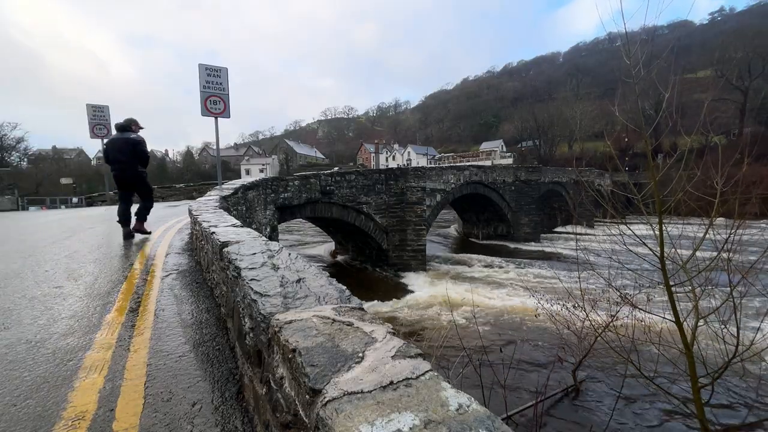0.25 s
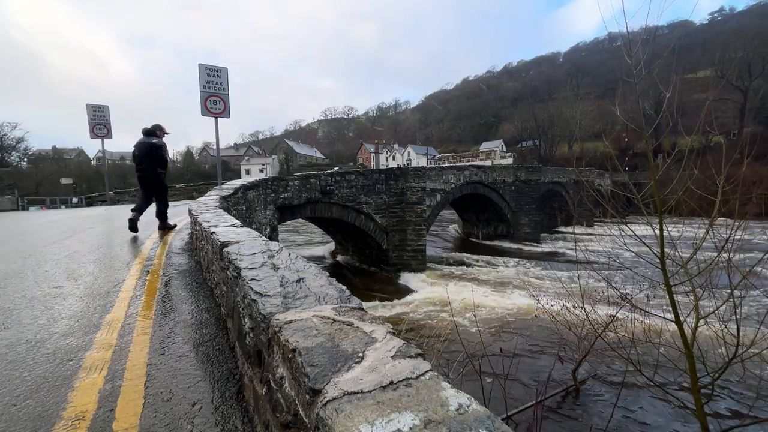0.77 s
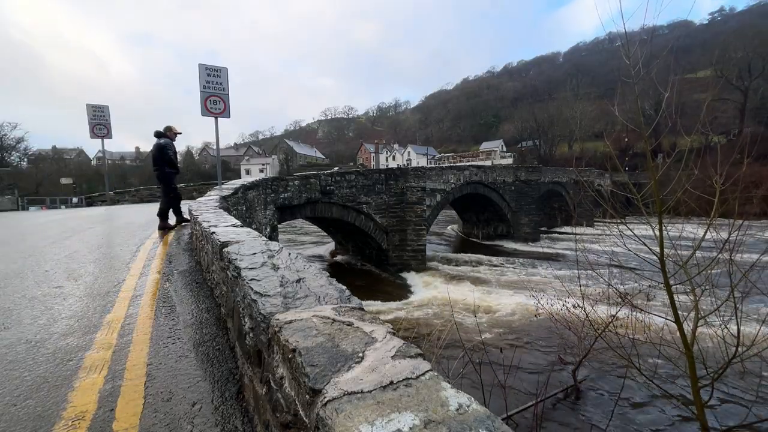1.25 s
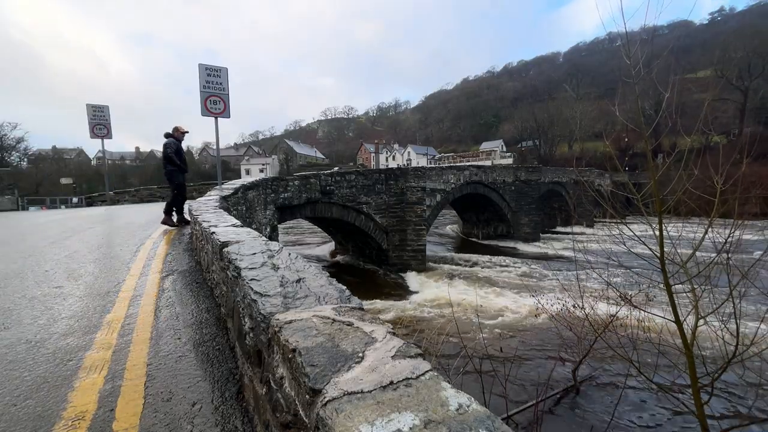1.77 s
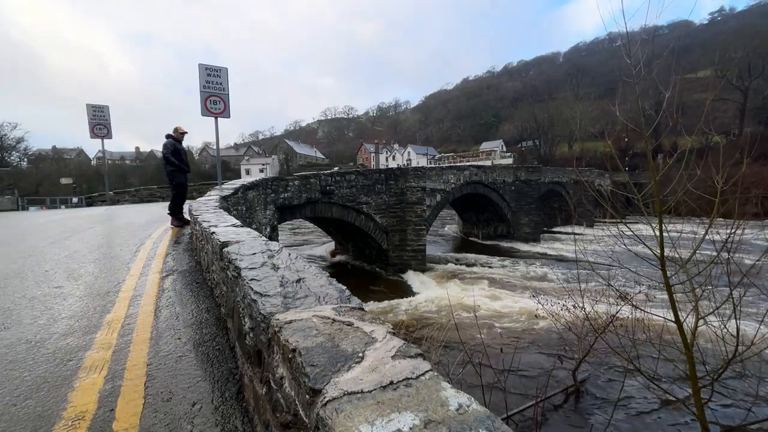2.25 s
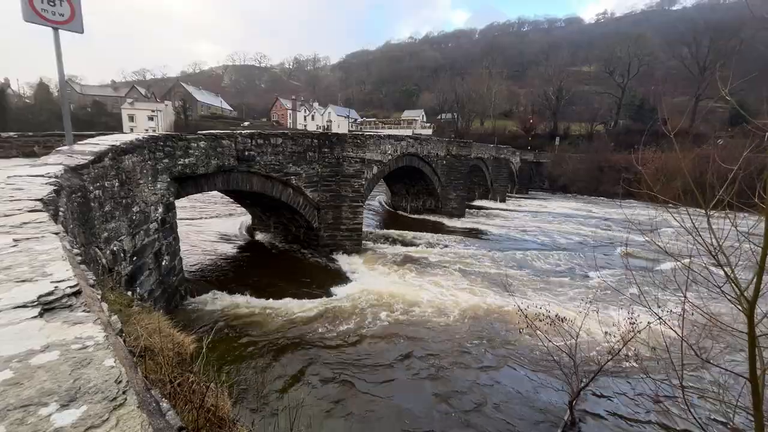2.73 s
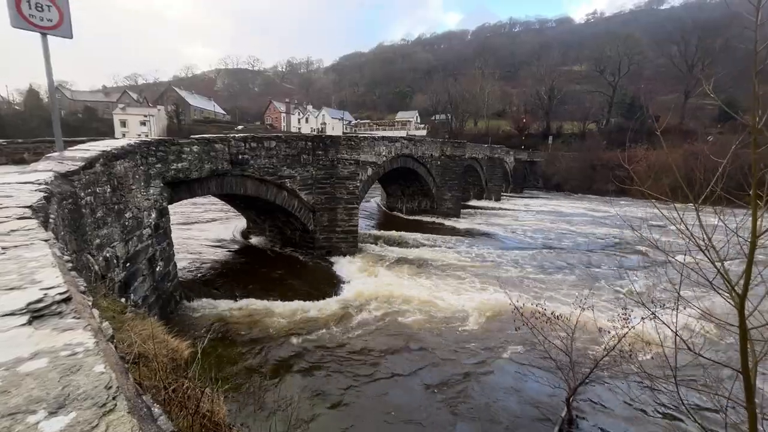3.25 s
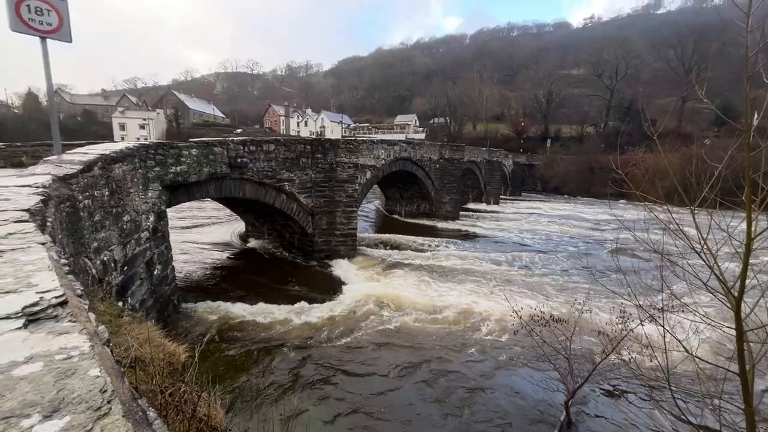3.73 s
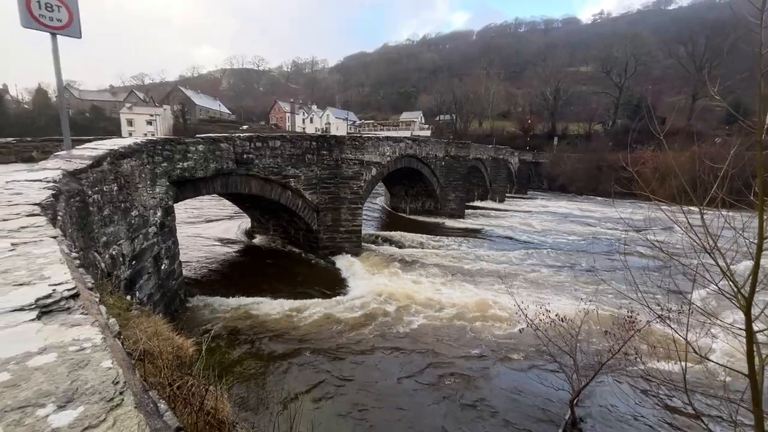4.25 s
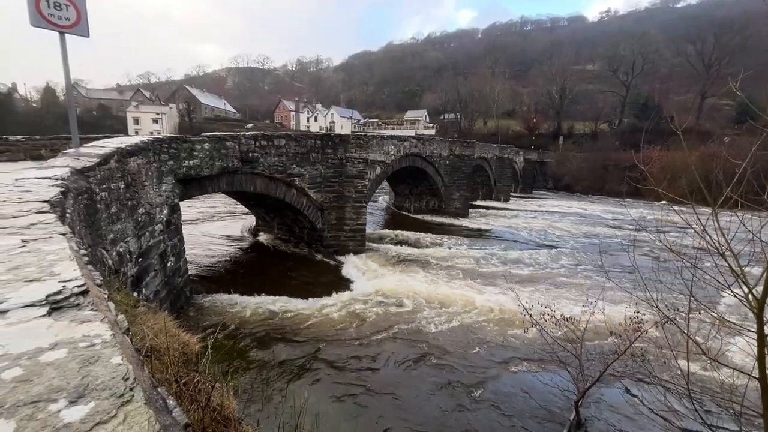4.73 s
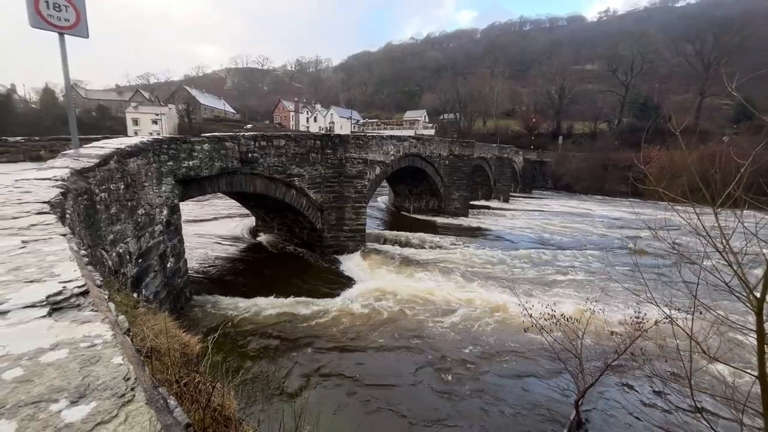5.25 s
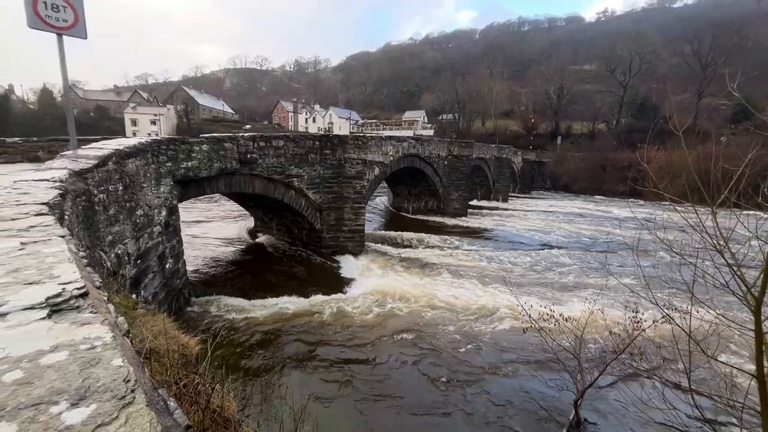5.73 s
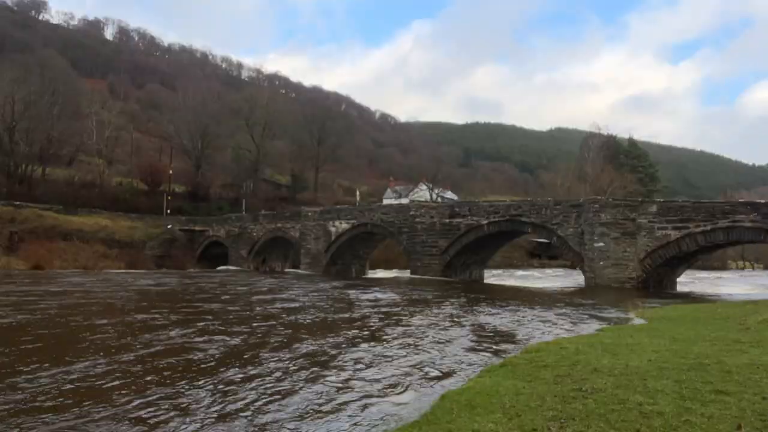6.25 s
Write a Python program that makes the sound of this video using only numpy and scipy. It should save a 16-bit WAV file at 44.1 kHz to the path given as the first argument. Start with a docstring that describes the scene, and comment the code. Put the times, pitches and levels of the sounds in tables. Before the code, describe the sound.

Outdoors, steady broadband white water pours through bridge arches throughout. Faint wind rumble opens the scene; after about two seconds the river's tone changes and wind hits the bare microphone hard, with deep flapping thuds and short clipped dropouts. The roar dips slightly under gusts and recovers. At the end a sudden change brings a sheltered, mellower river with less hiss.

```python
"""River in flood under a stone bridge

A flooded river pours through the arches, heard from the road, then the parapet, then the bank.
The white water is a dense roar of noise for the bubble clouds, its treble heard as a hiss of spray,
with single ringing bubbles on top; each place has its own tone. Wind is low-pitched noise that rumbles
on the microphone; its hardest gusts overload it and briefly choke the river."""
import sys
import numpy as np
from scipy import signal
from scipy.fft import rfft, irfft, next_fast_len
from scipy.io import wavfile
from scipy.ndimage import uniform_filter1d, map_coordinates

SR = 44100
rng = np.random.default_rng(int(sys.argv[2]) if len(sys.argv) > 2 else 0)


def master_out(mix):
    """Clip the mix to full scale and print it as 16-bit PCM to the path in sys.argv[1]."""
    frames = np.transpose(np.atleast_2d(mix))
    ceiling = np.clip(frames, -1, 1)
    pcm = np.round(ceiling * 32767).astype(np.int16)
    wavfile.write(sys.argv[1], SR, pcm)


N = 286209  # samples, about 6.5 s

# When the listening place changes, to the parapet and then to the bank: t/s
MOVE_TIMES = [2.325, 5.968]
# Tone of the river from the road, relative: f/Hz, level/dB
ROAD_TONE = [(53, -40), (90, -7.5), (117, -11), (155, -6), (238, -1.5), (658, -3), (1040, -6), (2410, -11),
             (6370, -22.5), (8260, -22), (10000, -34.5), (12700, -30.5), (15800, -42.5)]
# Tone of the river from the parapet, relative: f/Hz, level/dB
PARAPET_TONE = [(65, -7), (110, -6.5), (135, -3), (258, -1), (292, -2), (592, -2), (776, -3), (1230, -5.5),
                (1640, -7.5), (3470, -13), (6600, -21.5), (8300, -20), (10200, -32), (13400, -29),
                (15800, -43)]
# Tone of the river from the bank, relative: f/Hz, level/dB
BANK_TONE = [(24, -60), (40, -29), (162, -3.5), (236, -5.5), (476, -4), (766, -7), (983, -7.5),
             (1290, -13.5), (2480, -15.5), (5000, -24.5), (5670, -28), (8240, -29), (9820, -42),
             (11700, -41.5), (15800, -53)]
# Tone of the small eddies on the microphone, relative: f/Hz, level/dB
SMALL_EDDY_TONE = [(10, -33), (20, -2), (25, 5), (33, 5), (48, -4.5), (70, -12), (110, -38), (200, -34.5),
                   (500, -92)]
# Tone of the large, slow eddies, relative: f/Hz, level/dB
LARGE_EDDY_TONE = [(1, -23.5), (4, -1.5), (8, -3), (14, -10.5), (20, -29), (28, -49), (45, -78),
                   (100, -120)]
# Gusts that overload the microphone: start t/s, end t/s, direction (push +1, suction -1)
OVERLOADS = [(2.928, 2.964, 1), (3.073, 3.121, 1), (3.268, 3.281, 1), (4.448, 4.46, -1), (5.049, 5.059, -1),
             (5.425, 5.44, 1), (5.453, 5.509, -1), (5.602, 5.618, 1), (5.8, 5.819, 1)]
# Puffs of wind: start t/s, end t/s, strength level/dB, turn-down of the heard roar level/dB (below 0: none)
WIND_PUFFS = [(0.0, 0.15, -43.5, 3), (0.356, 0.55, -37, 4.5), (0.62, 0.69, -39.5, 3.5),
              (1.18, 1.57, -41.5, 5), (2.288, 2.32, -41, -1.5), (2.819, 3.173, -32, 2.4),
              (3.255, 3.36, -21, 3), (3.497, 3.555, -17, 2.5), (3.6, 4.15, -32.5, 1.2),
              (4.29, 4.468, -32.5, 0), (4.832, 5.023, -25.5, 1.5), (5.055, 5.546, -26.5, 1.7),
              (5.757, 5.928, -29.5, 0.6)]

RAIL = 0.48  # the swing at which the microphone flattens, full scale = 1
TOP_HZ = 15850  # upper band limit of the microphone
CALM_DB = -52.5  # strength of the light air between puffs
ATTACK_DB_PER_S, RELEASE_DB_PER_S = 299, 104  # a puff builds quickly and dies more slowly
RECOVER_DB_PER_S = 9.5  # the heard level of the roar recovers at this rate after a puff
SWAY_OVER_DB, SWAY_TOP_DB = 23.5, -14.5  # large eddies: strength over the small ones, and its ceiling


def amp(db):
    """Decibels to gain."""
    return 10 ** (np.asarray(db) / 20)


def unit(x):
    """Scale to rms 1."""
    return x / np.sqrt(np.mean(x ** 2) + 1e-20)


def colour(points, hz):
    """Gain of (Hz, dB) points joined on a log frequency axis."""
    f, db = np.transpose(points)
    return amp(np.interp(np.log(hz + 1), np.log(f + 1), db))


def step(u):
    """A smooth rise from 0 to 1 around u = 0."""
    return (1 + np.tanh(u)) / 2


def wobble(rate):
    """A smooth random curve, rate knots a second."""
    knots = rng.standard_normal(int(N * rate / SR) + 4)
    return map_coordinates(knots, [np.arange(N) * rate / SR])


def filtered(x, response):
    """Shape x by a gain that depends on frequency."""
    size = next_fast_len(N + SR // 2)
    hz = np.fft.rfftfreq(size, 1 / SR)
    return irfft(rfft(x, size) * response(hz), size)[:N]


def churn(patchy_db):
    """Clouds of bubbles: noise that swells in patches of time and pitch."""
    cells = signal.stft(rng.standard_normal(N), nperseg=512)[2]
    patches = uniform_filter1d(rng.standard_normal(cells.shape), size=5, axis=0)  # spread over pitch
    patches = uniform_filter1d(patches, size=14, axis=1)  # spread over time
    swelling = cells * amp(patchy_db * unit(patches))
    return unit(signal.istft(swelling, nperseg=512)[1][:N])


def bubbles(count, centre_hz, spread, cycles, rise, scatter_db):
    """Single bubbles ring for a few cycles, 20 ms at most, and rise in pitch as they surface."""
    when, pitch, size = rng.random(count), rng.standard_normal(count), rng.standard_normal(count)
    hz = np.clip(centre_hz * np.exp(spread * pitch), 250, 9000)[:, None]
    age = np.arange(SR // 50)  # samples
    turns = hz * age / SR
    life = np.minimum(turns / cycles, 1)  # 0 at birth, 1 when silent
    ring = np.sin(2 * np.pi * turns * (1 + rise * life / 2)) * (1 - life) ** 4
    ring = ring * amp(scatter_db * size)[:, None] * hz / centre_hz  # higher ones ring louder
    at = (when * N).astype(int)[:, None] + age
    return unit(np.bincount(at.ravel(), ring.ravel(), N)[:N])


def white_water(water, tone, level_db):
    """The water as it sounds from one place, at an rms level before any turn-down."""
    return amp(level_db) * unit(filtered(water, lambda hz: colour(tone, hz)))


def turn_down():
    """Cut in dB: the heard roar falls gradually in a puff, then recovers, as if a recorder turned it down."""
    t = np.arange(N) / SR
    cuts = []
    for start, end, _, depth_db in WIND_PUFFS:
        falling = np.interp(t, [start, end], [0, depth_db])
        cuts.append(falling - RECOVER_DB_PER_S * np.maximum(t - end, 0))
    return np.maximum(np.max(cuts, axis=0), 0)


def river():
    """Tumbling water under the arches: one bed of bubbles, toned for three places in turn."""
    t = np.arange(N) / SR
    single = bubbles(count=4000, centre_hz=1296, spread=0.797, cycles=15, rise=0.15, scatter_db=3.0)
    flutter = amp(0.14 * wobble(16))
    water = (churn(patchy_db=1.0) + amp(-15.5) * single) * flutter
    road = white_water(water, ROAD_TONE, level_db=-29.5)
    parapet = white_water(water, PARAPET_TONE, level_db=-33.0)
    bank = white_water(water, BANK_TONE, level_db=-27.9)
    on_parapet, on_bank = [step((t - move) / 0.0033) for move in MOVE_TIMES]  # quick crossfades
    roar = road + on_parapet * (parapet - road) + on_bank * (bank - parapet)
    return amp(-turn_down()) * roar


def wind_strength():
    """Wind strength in dB: each puff builds, holds and dies back into the calm; the bank is sheltered."""
    t = np.arange(N) / SR
    strength_db = np.full(N, float(CALM_DB))
    for start, end, db, _ in WIND_PUFFS:
        below_db = ATTACK_DB_PER_S * np.maximum(start - t, 0) + RELEASE_DB_PER_S * np.maximum(t - end, 0)
        strength_db = np.maximum(strength_db, db - below_db)
    at_bank = step((t - MOVE_TIMES[-1]) / 0.01)
    return strength_db + at_bank * (CALM_DB - strength_db)


def eddies(tone, strength_db, level_db):
    """Turbulent pressure of one range of eddy sizes: toned noise that follows the wind strength."""
    rumble = unit(filtered(rng.standard_normal(N), lambda hz: colour(tone, hz)))
    return amp(strength_db + level_db) * rumble


def wind():
    """Large and small eddies press on the microphone; hard gusts drive it past its rail."""
    t = np.arange(N) / SR
    strength_db = wind_strength()
    sway_db = np.minimum(strength_db + SWAY_OVER_DB, SWAY_TOP_DB)
    small = eddies(SMALL_EDDY_TONE, strength_db, level_db=1.0)
    large = eddies(LARGE_EDDY_TONE, sway_db, level_db=1.0)
    pressure = small + large
    swing = 0.93 * RAIL  # ordinary eddies bend over softly inside the rail
    pressure = pressure / (1 + (pressure / swing) ** 4) ** (1 / 4)
    for start, end, direction in OVERLOADS:
        inside = np.minimum(t - start, end - t)  # seconds from the gust's nearer edge
        # the surge crosses the rail near both edges and sweeps the eddies away
        surge = step((inside + 0.002) / 0.010)
        takeover = step((inside + 0.011) / 0.006)
        pressure = pressure * (1 - takeover) + np.sign(direction) * 2 * RAIL * surge
    return pressure


def scene():
    """River and wind at one microphone."""
    return (river() + wind())[None]


def record(dry):
    """The microphone flattens at its rail, which chokes the river, and drops all above its band limit."""
    clipped = np.clip(dry[0], -RAIL, RAIL)
    return filtered(clipped, lambda hz: hz < TOP_HZ)[None]


dry = scene()
out = record(dry)
master_out(out)
```